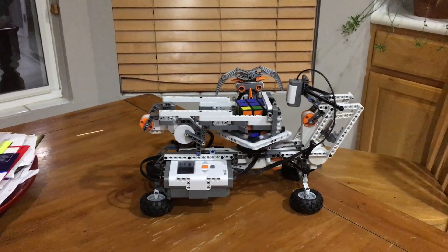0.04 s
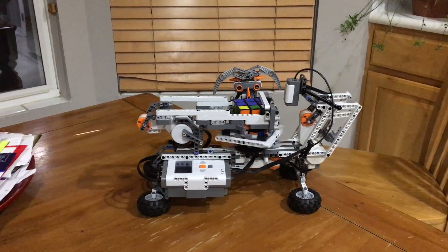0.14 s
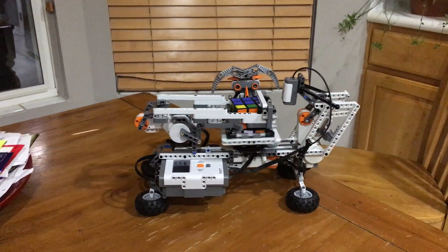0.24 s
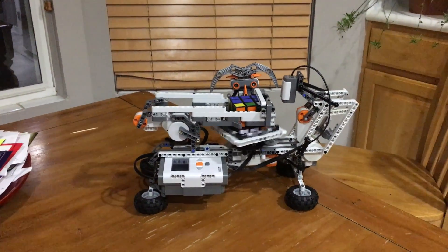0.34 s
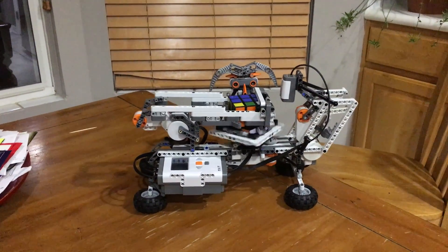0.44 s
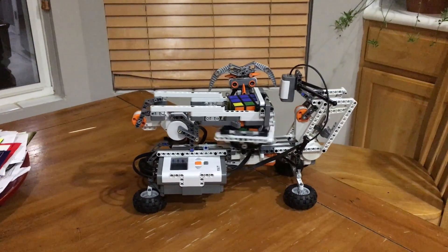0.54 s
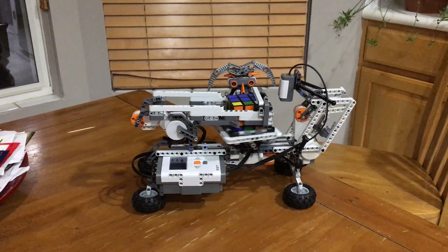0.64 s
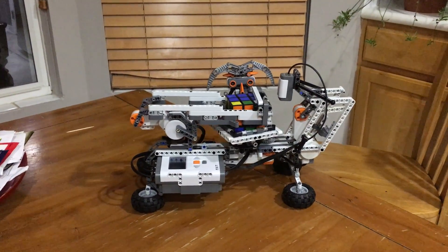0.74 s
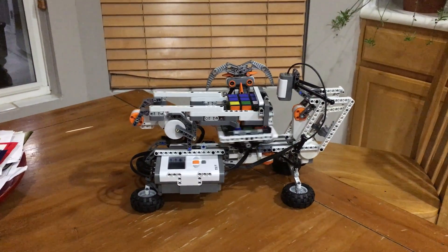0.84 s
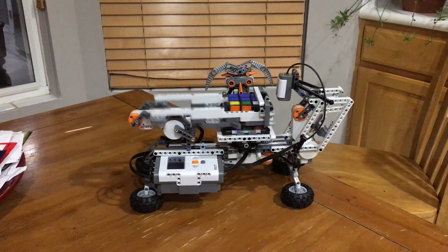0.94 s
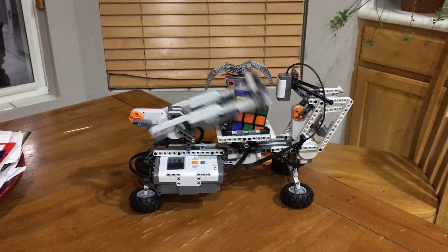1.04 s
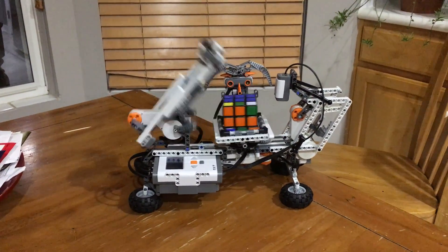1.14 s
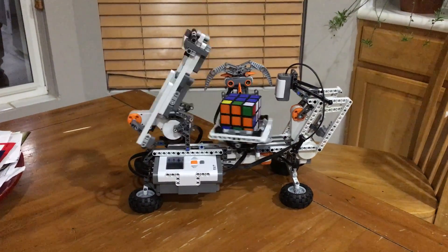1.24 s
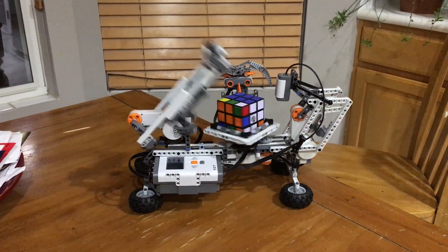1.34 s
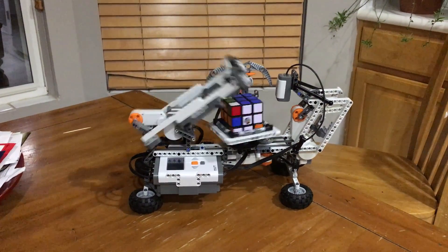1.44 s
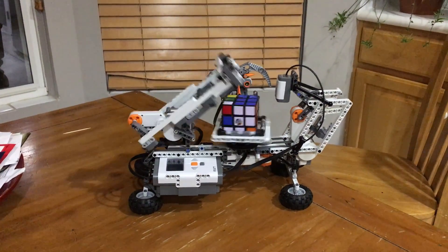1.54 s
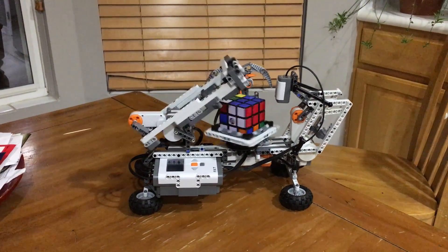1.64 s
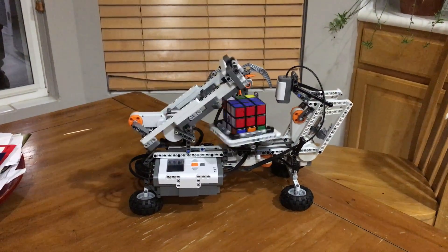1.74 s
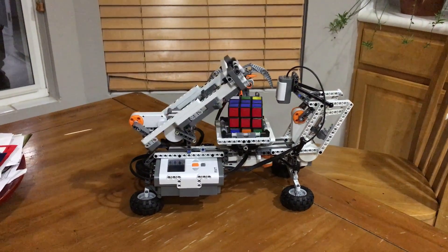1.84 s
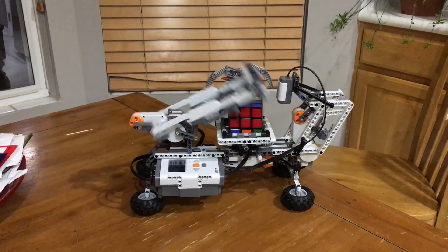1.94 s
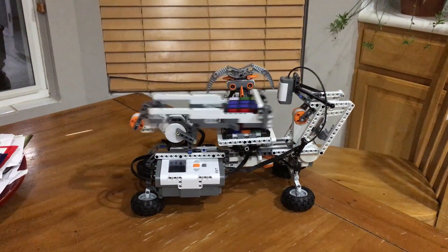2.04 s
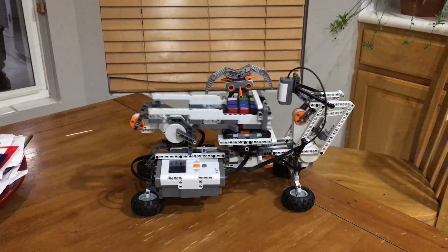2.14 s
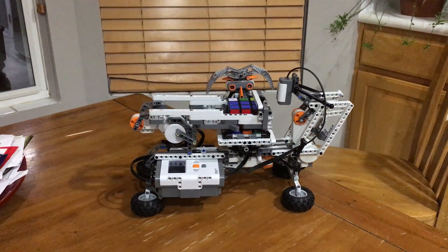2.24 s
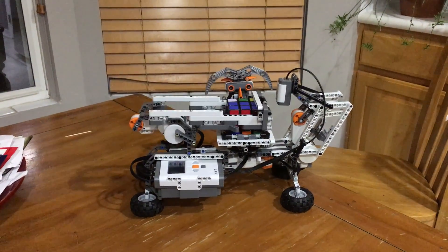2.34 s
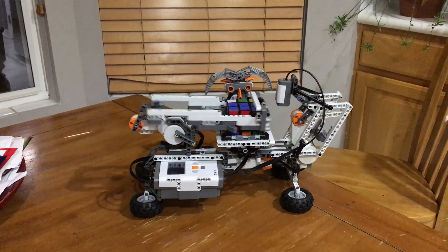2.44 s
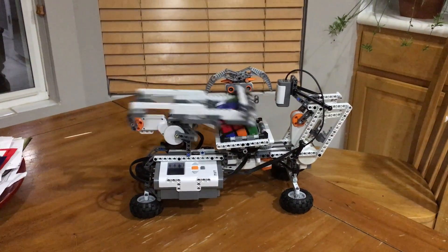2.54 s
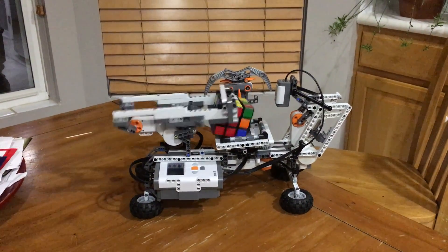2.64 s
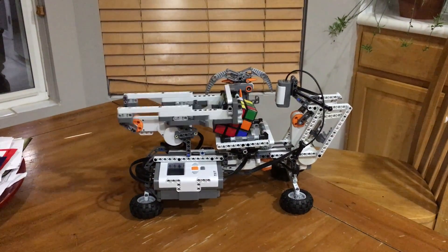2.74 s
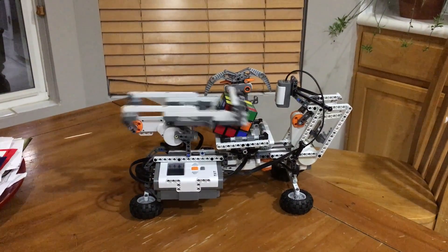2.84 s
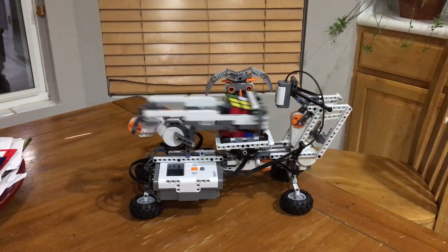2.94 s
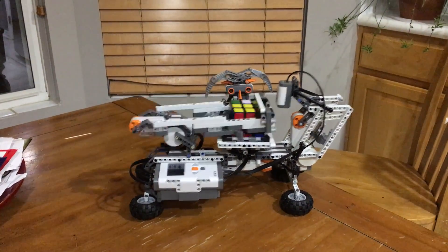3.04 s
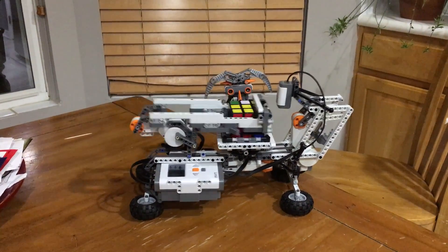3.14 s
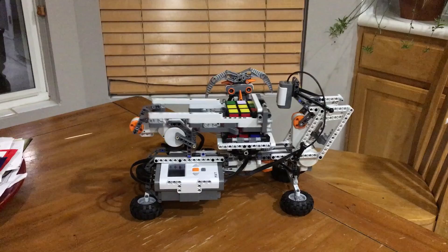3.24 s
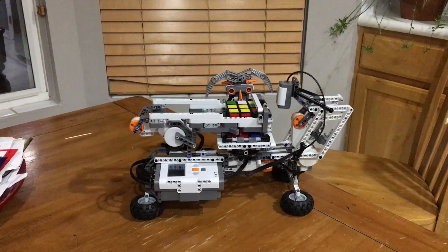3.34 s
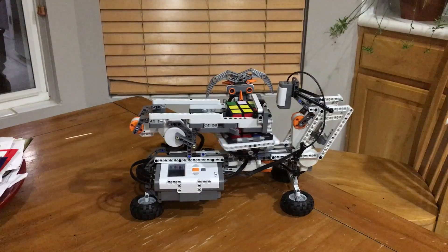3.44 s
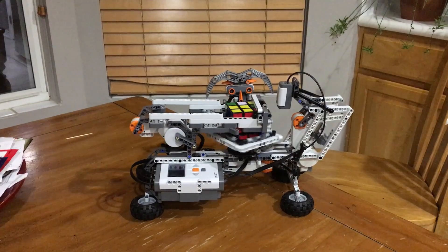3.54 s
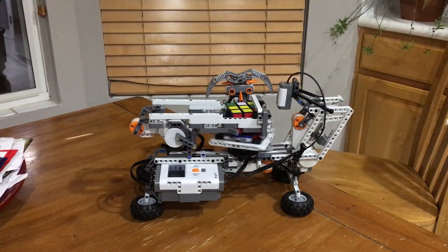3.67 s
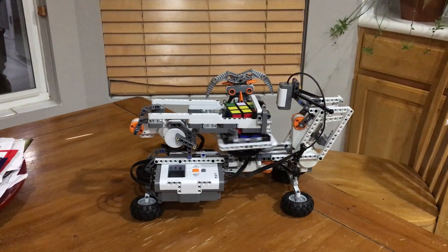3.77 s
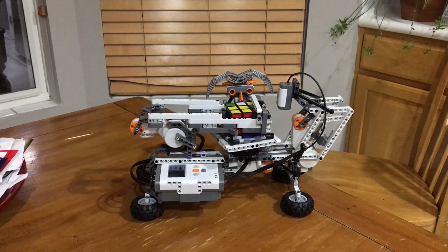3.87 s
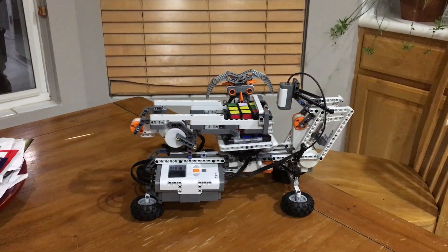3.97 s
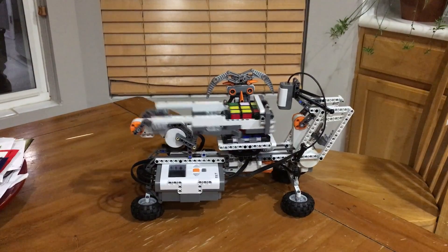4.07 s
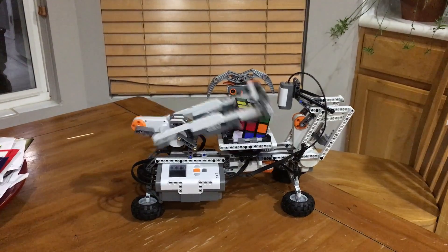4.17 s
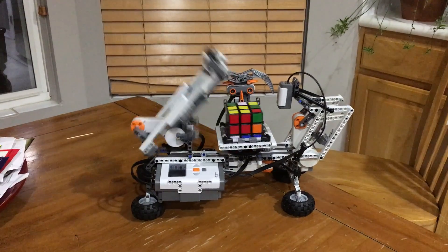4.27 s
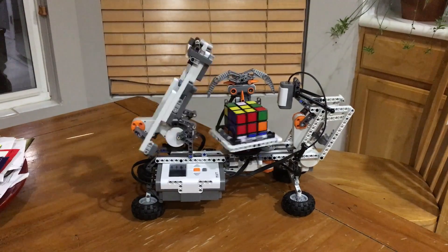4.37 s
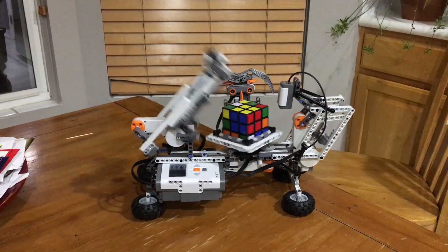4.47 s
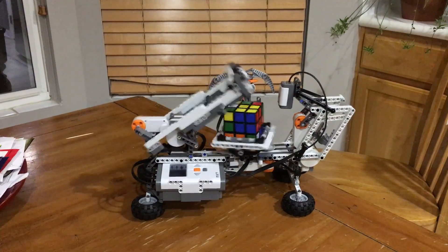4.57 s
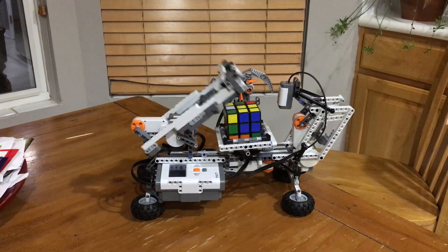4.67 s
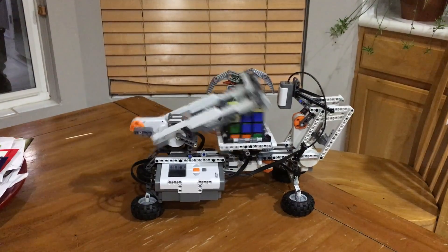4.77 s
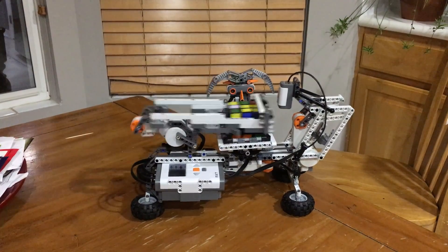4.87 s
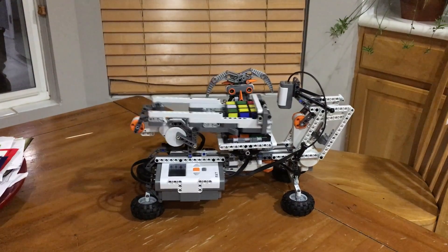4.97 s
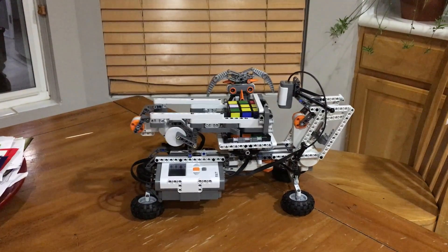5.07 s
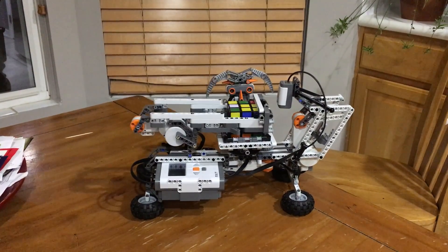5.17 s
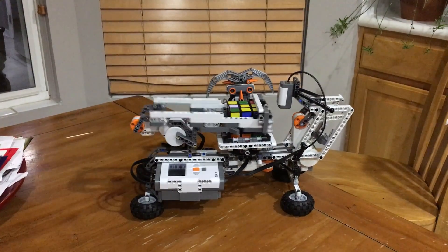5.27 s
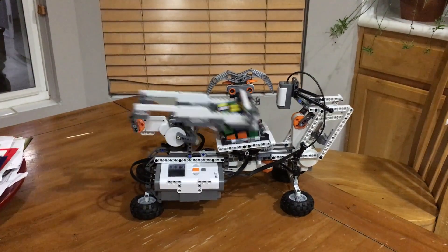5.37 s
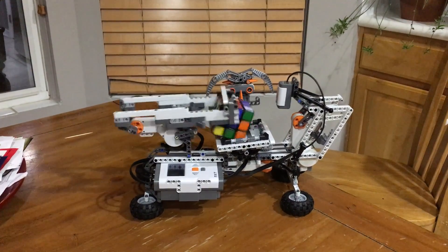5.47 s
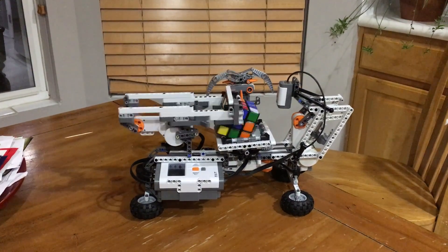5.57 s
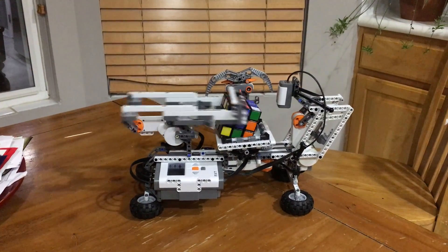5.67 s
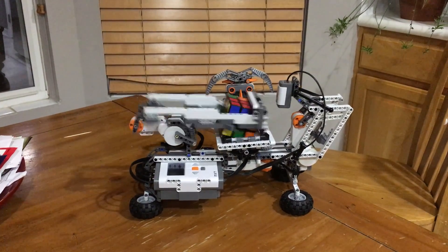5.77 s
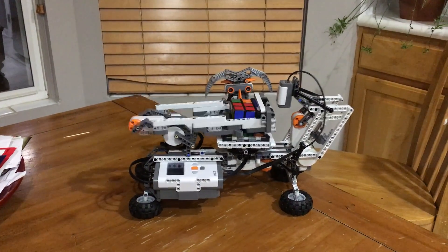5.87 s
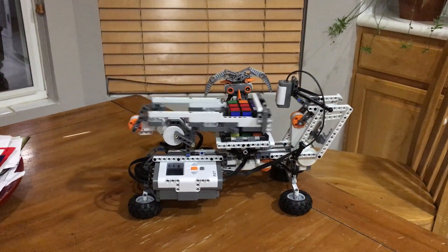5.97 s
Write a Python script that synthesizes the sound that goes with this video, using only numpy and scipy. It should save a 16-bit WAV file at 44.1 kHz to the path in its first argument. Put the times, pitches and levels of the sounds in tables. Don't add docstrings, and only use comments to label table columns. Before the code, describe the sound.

Two small electric motors take turns: a high, buzzy gear whine that bends in pitch, and brief, grittier lifting whirs. Between them come hard plastic clicks, short cube rattles and low knocks through a wooden table. The loudest clatter falls near the end of the second cycle. Room reverberation is short, the air nearly silent, with faint regular pattering near the microphone.

```python
import sys
import numpy as np
from scipy import signal
from scipy.fft import rfft, irfft
from scipy.io import wavfile
from scipy.ndimage import uniform_filter1d

SR = 44100
rng = np.random.default_rng(int(sys.argv[2]) if len(sys.argv) > 2 else 0)


def transcribe(signal):
    frames = np.atleast_2d(signal).T
    limited = np.clip(frames, -1, 1)
    pcm = np.round(limited * 32767).astype(np.int16)
    wavfile.write(sys.argv[1], SR, pcm)


def nominal_scale(level):
    x = np.asarray(level, float) / 20
    return 10 ** x


N = 265072


def evened(x):
    return x / np.sqrt(np.mean(x ** 2) + 1e-20)


def read(points, hz):
    f, value = np.transpose(points)
    return np.interp(np.log(hz + 1), np.log(f + 1), value)


def add(mix, s, sound):
    at = round(s * SR)
    part = mix[max(at, 0):][:len(sound) + min(at, 0)]
    part += sound[max(-at, 0):][:len(part)]


def drift(count, per_s):
    size = max(int(SR / per_s), 1)
    return evened(uniform_filter1d(uniform_filter1d(rng.standard_normal(count), size), size))


def span(length):
    return np.arange(int(np.ceil(length / .2) * .2 * SR)) / SR


# (frequency [Hz], level [dB])
HUSH_COLOUR = [(18, -61), (30, -33), (138, 13.5), (364, 11.5), (684, -16.5), (1590, -11.5), (2350, -48),
               (16000, -58)]


def hush():
    hz = np.fft.rfftfreq(N, 1 / SR)
    noise = rfft(rng.standard_normal(N)) * nominal_scale(read(HUSH_COLOUR, hz))
    return nominal_scale(-82.5) * evened(irfft(noise, N))


def room(x):
    t = np.arange(9000) / SR
    low = uniform_filter1d(rng.standard_normal(len(t)), size=8) * 1.088 * nominal_scale(-60 * t / 0.1835)
    full = rng.standard_normal(len(t)) * nominal_scale(-60 * t / 0.0917)
    tail = (low + full) * (t > .004)
    return signal.oaconvolve(x, tail / np.linalg.norm(tail))[:N]


# (start [s], length [s], level [dB], swell [dB])
SPELLS = [
    (0, 0.048, -50, -0.5),
    (0.079, 0.983, -58.5, 6.5),
    (1.173, 0.434, -60.5, -4.5),
    (2.081, 0.429, -50.5, -5.5),
    (2.997, .17, -59, 8.5),
    (3.375, 0.782, -63.5, 11.5),
    (4.417, 0.173, -61, 1.5),
    (5.0, 0.461, -53, -3.5),
    (5.896, 0.155, -49.5, 3.5),
]


def patter_db(t):
    levels = []
    for s, length, db, swell_db in SPELLS:
        swell = swell_db * np.clip((t - s) / length, 0, 1)
        outside = 600 * np.maximum(s - t, 0) + 119.5 * np.maximum(t - s - length, 0)
        levels.append(db + swell - outside)
    return np.max(levels, axis=0)


# (start [s], end [s])
RUNS = [(.0357, 2.5), (2.553, 5.0), (5.022, 6.0)]
# (time [s], lateness [ms])
LATENESS = [(0, 1.5), (.4, .3), (.75, 1.7), (1.25, -1.3), (2.1, 1.5), (3.25, 1.4), (3.7, 2.7), (4.4, 1.3),
            (5.05, 1.6), (5.45, -1.2)]


def patter():
    t = np.arange(800) / SR - .003
    hz = 265 + 330 / (1 + np.exp((t - .0004) / .0003))
    turns = np.cumsum(hz) / SR - np.sum(hz[t < 0]) / SR
    since = t + .0004
    shape = np.where(since < 0, np.exp(-(since / .0013) ** 2), np.exp(-since / .0034))
    chirp = np.cos(2 * np.pi * turns) * shape
    chirp -= .3 * np.exp(-((t + .0009) / .0002) ** 2)
    thump = np.sin(2 * np.pi * 185 * (t + .003)) * np.hanning(len(t))

    beat_s = .04855
    beats = np.concatenate([np.arange(start, end, beat_s) for start, end in RUNS])
    luck = rng.standard_normal((len(beats), 4))
    at = beats + np.interp(beats, *np.transpose(LATENESS)) / 1000 - .003
    size = nominal_scale(patter_db(beats) + 2.0 + 2 * luck[:, 0])
    train, thumps = np.zeros((2, N + SR))
    for k, (late_s, echo_db) in enumerate([(0, 0), (.0168, -13), (.033, -19)]):
        train[((at + late_s) * SR).astype(int)] += size * nominal_scale(echo_db + k * luck[:, k])
    thumps[(at * SR).astype(int)] = size * .22 * nominal_scale(3.5 * luck[:, 3])

    i = np.arange(3000)
    swell = signal.oaconvolve(train, nominal_scale(-60 * i / SR / 0.18) * (i > 250))[:N]
    band = signal.butter(4, [80, 900], "band", fs=SR, output="sos")
    murmur = signal.sosfilt(band, swell * rng.standard_normal(N))
    ticks = signal.oaconvolve(train, chirp) + signal.oaconvolve(thumps, thump)
    return ticks[:N] + nominal_scale(-5.0) * murmur


# (frequency [Hz], time to fall 60 dB [s])
TABLE_MODES = [(142, .09), (272, .07)]


def thud(s, db, upper_db):
    t = np.arange(9000) / SR
    modes = 0
    for mode_db, (f, t60) in zip((0, upper_db), TABLE_MODES):
        tone = np.sin(2 * np.pi * f * rng.uniform(0.9434, 1.04) * t)
        modes = modes + nominal_scale(mode_db - 60 * t / t60) * tone
    return s, nominal_scale(db + 2.8) * modes * (1 - np.exp(-t / .006)) * (1 + .45 * drift(len(t), 120))


# (time [s], peak level [dB], upper mode against lower [dB])
THUDS = [(1.204, -54, -2), (1.491, -45, 2.5), (2.123, -55, 0), (2.169, -60.5, 5), (2.716, -60, -9.5),
         (3.135, -53, -2), (4.348, -50.5, -5.5), (4.634, -43.5, -6.5), (4.921, -52.5, 8.5),
         (4.968, -57, -7), (5.94, -46, 4.5)]


def table_thuds(mix):
    for row in THUDS:
        add(mix, *thud(*row))


def knock(s, db, hz, fizz_db):
    t = np.arange(2600) / SR
    ring = np.sin(2 * np.pi * hz * t) * nominal_scale(-60 * t / 0.043)
    crack = rng.standard_normal(len(t)) * nominal_scale(-60 * t / 0.028)
    crack = signal.sosfilt(signal.butter(2, 2500, "high", fs=SR, output="sos"), crack)
    return s, nominal_scale(db - 5.5) * (ring + nominal_scale(fizz_db - 4.5) * crack) * np.minimum(t / 0.0005, 1)


# (time [s], peak level [dB], ring [Hz], crack against ring [dB])
KNOCKS = [(1.021, -41, 2130, -16.5), (1.164, -59, 1360, -6.5), (1.463, -45.5, 1115, 17),
          (2.091, -39.5, 1901, 15), (2.724, -40, 1390, -31.5), (2.782, -44.5, 1416, -34),
          (2.987, -33, 1182, -14.5), (3.225, -52, 1201, -0.5), (3.324, -51.5, 1176, -12.5),
          (3.531, -30.5, 1895, -22), (4.595, -35, 1720, 13.5), (4.852, -47.5, 1155, -30),
          (4.877, -30, 1219, 3), (4.916, -29.5, 1287, 1.5), (4.958, -30.5, 1272, -8.5),
          (5.545, -37, 1647, -39), (5.847, -44, 1256, -20.5), (5.889, -44.5, 1242, -4)]


def plastic_knocks(mix):
    for row in KNOCKS:
        add(mix, *knock(*row))


def casing_db(casing, hz, lift_db):
    colour, peaks = casing
    humps = sum(1 / (1 + ((hz - f) / w) ** 2) * nominal_scale(db / 4) for f, w, db in peaks)
    return read(colour, hz) + 20 * np.log10(1 + nominal_scale(lift_db) * humps)


def radiate(drive, casing, level_db, mid_db, fizz_db, lift_db):
    hz = np.fft.rfftfreq(len(drive), 1 / SR)
    z = rfft(drive) * nominal_scale(casing_db(casing, hz, lift_db))
    step = [1 / (1 + (edge / (hz + 1)) ** 16) for edge in (2800, 7000)]
    panels = (1 - step[0], step[0] - step[1], step[1])
    sound = 0
    for panel, db in zip(panels, (0, mid_db, fizz_db)):
        sound = sound + nominal_scale(level_db + db) * evened(irfft(z * panel, len(drive)))
    return sound


def mottle(x, patch_db):
    z = signal.stft(x, nperseg=256)[2]
    patches = uniform_filter1d(rng.standard_normal(z.shape), size=3, axis=0)
    patches = uniform_filter1d(patches, size=7, axis=1)
    return np.resize(signal.istft(z * nominal_scale(patch_db * evened(patches)), nperseg=256)[1], len(x))


def tumble(row, from_db, to_db):
    s, length, db, hz, bright_db = row
    t = span(length + .13)
    force_db = db + np.interp(t, [0, length], [from_db, to_db]) - 244.5 * np.maximum(t - length, 0)
    mid_db = -6 + bright_db - 97 * t
    fizz_db = -5.5 + bright_db - 165 * t
    hollow_hz = hz * (1 + 0.055 * (1 - 2 * np.minimum(t / length, 1)))
    return s, force_db, mid_db, fizz_db, hollow_hz


# (frequency [Hz], width [Hz], level [dB])
CUBE = [(240, -57.5), (400, -31.5), (607, -7), (1310, 4.5), (2320, -7), (4310, -4.5), (4800, -16),
        (5430, -5), (6740, -21), (12100, -31.5), (16000, -28.5)], [(3624, 29, -16.5), (4199, 14, 4.5),
        (5610, 13, -11)]


def clatter(motion):
    s, force_db, mid_db, fizz_db, hollow_hz = motion
    n = len(force_db)
    taps = (rng.random(n) < 3000 / SR) * rng.standard_normal(n)
    taps = taps * nominal_scale(2 * np.minimum(rng.exponential(1, n), 3))
    drive = mottle(evened(taps) + 1.6 * rng.standard_normal(n), 4.06)
    turn = np.exp(2j * np.pi * np.cumsum(hollow_hz) / SR)
    r = np.exp(-np.pi * 230 / SR)
    hollow = signal.lfilter([(1 - r) ** 2], [1, -2 * r, r * r], drive / turn)
    hollow = evened((turn * hollow).real)
    i = np.arange(n)
    edge = np.minimum(np.minimum(i / (0.00067 * SR), i[::-1] / (0.023 * SR)), 1)
    body = radiate(drive, CUBE, force_db - 3, mid_db + 3, fizz_db + 3, 4.)
    return s, (body + nominal_scale(force_db - 9.5) * hollow) * edge


# (start [s], chatter [s], force [dB], cradle hollow [Hz], brightness [dB])
SLIDES = [(1.461, .014, -48, 1256, 3.5), (2.082, 0.0261, -48, 1405, 7.5), (2.715, .026, -58.5, 1254, -12),
          (2.985, 0.0982, -43.5, 1302, 5), (4.85, 0.038, -44, 1226, -5), (5.542, 0.0649, -59.5, 1563, -8),
          (5.846, 0.0719, -43.5, 1253, 1.5)]
DROPS = [
    (1.163, .044, -42, 1238, -0.5),
    (2.78, .052, -52, 1477, -11.5),
    (4.913, 0.092, -37.5, 1271, 5.5),
]
SHAKES = [
    (4.305, .13, -54, 1326, 7.6),
    (4.59, .08, -50, 1740, 8.04),
]


def cube_clatter(mix):
    for rows, from_db, to_db in [(SLIDES, -5.5, 0), (DROPS, 0, -15), (SHAKES, 0, -3)]:
        for row in rows:
            add(mix, *clatter(tumble(row, from_db, to_db)))


def spin_up(top_hz, missing, tau_s):
    return lambda s, t: top_hz * (1 - missing * np.exp(-t / tau_s))


def burst(row, gait, speed):
    s, length, db, swell_db, bright_db = row
    rise, rise_db, fall, fall_db, mid_db, fizz_db, whine_db = gait
    t = span(length)
    hz = speed(s, t)
    edge_db = -rise_db * np.clip(1 - t / rise, 0, 1) - fall_db * np.clip(1 - (length - t) / fall, 0, 1)
    stop_db = -3000 * np.maximum(t - length, 0)
    effort_db = db + swell_db * t / length + edge_db + stop_db
    bright_db = bright_db + 15.5 * np.log2(hz / hz.max())
    return (s, hz, effort_db, mid_db + bright_db + .05 * edge_db,
            fizz_db + bright_db + 0.37 * edge_db, whine_db + .4 * edge_db)


def motor(motion, casing, orders, noise_db, rough):
    s, hz, effort_db, mid_db, fizz_db, whine_db = motion
    n = len(effort_db)
    turns = np.cumsum(hz * (1 + 0.0021 * drift(n, 50))) / SR
    rattle = rng.standard_normal(n) * (1 + 0.1 * np.cos(2 * np.pi * turns / 10)) * nominal_scale(1.5 * drift(n, 150))
    grid = np.arange(0, 8000, 4)
    flare_db = 1.074 * (casing_db(casing, grid, 7.6) - read(casing[0], grid))
    whine = 0
    for k, db in orders:
        broken = min(rough * np.sqrt(k * hz.mean() / 1000), 1)
        flutter = drift(n, k * hz.mean() / 25) + 1j * drift(n, k * hz.mean() / 25)
        line = (1 - broken + broken * flutter) * np.exp(2j * np.pi * (k * turns + rng.random()))
        whine += nominal_scale(db + np.interp(k * hz, grid, flare_db) + 4 * drift(n, 16)) * line.real
    hiss = radiate(mottle(rattle, 4.), casing, effort_db + noise_db, mid_db, fizz_db, 5.)
    ends = signal.windows.tukey(n, min(0.0039 * SR / n, 1))
    return s, (hiss + nominal_scale(effort_db + whine_db) * evened(whine)) * ends


def run(mix, rows, gait, speed, casing, orders, noise_db, rough):
    for row in rows:
        add(mix, *motor(burst(row, gait, speed), casing, orders, noise_db, rough))


# colour (frequency [Hz], level [dB]), resonances (frequency [Hz], width [Hz], level [dB])
LIFTER = [(410, -57), (700, -34.5), (1040, -19.5), (1620, 0.5), (1800, -11.5), (2130, -0.5), (2590, -19.5),
          (4260, -5.5), (4990, -17.5), (10700, -43), (12200, -31), (16000, -44.5)], [(2130, 57, -14.5),
          (3503, 210, -14), (4232.5, 27, -9), (5700, 160, 2.5), (7277, 250, 4.5), (9520, 130, -0.5),
          (15900, 300, 7.5)]
LIFTS = [
    (1.0, .115, -48.5, 2, 0),
    (4.14, .12, -42, -10, 0),
]
REACHES = [
    (1.97, .12, -68, 10.1, -1),
    (2.885, 0.10496, -65.5, 1.5, 4.5),
    (4.81, .05, -61, 7, -4),
    (5.72, 0.1213, -73, 2.3, 6),
]
TOPS = [
    (1.1, .12, -48, -2, -0.19),
    (4.245, 0.1284, -46, -5.5, -1.42),
]
LIFT_GAIT = (0.0508, 29, .015, 3.5, 3, -10.5, -3.5)
REACH_GAIT = (0.0669, 18.5, -0.5, 1, 5, -4.5, -14)
TOP_GAIT = (0.01, 10, 0.0769, 23.5, 3.5, -10, -1.5)
LIFTING = [(2, -3), (3, -2.5), (4, -5), (5, -6.5), (6, -5.5)]
LIFTING_TOP = [(2.29, -3.5), (3.13, -18), (3.42, -5.5), (5.7, -7.5)]


def lifter_raises(mix):
    speed = spin_up(top_hz=712, missing=.01, tau_s=.05)
    run(mix, LIFTS, LIFT_GAIT, speed, LIFTER, LIFTING, -4., .33)
    run(mix, REACHES, REACH_GAIT, speed, LIFTER, LIFTING, -4., .33)
    run(mix, TOPS, TOP_GAIT, speed, LIFTER, LIFTING_TOP, -3., .25)


PUSHES = [
    (2.53, 0.1941, -54.5, -9, 0.032),
    (5.37, .18, -52, -11.5, 2.48),
]
PUSH_GAIT = (0.07, 25, 0.0356, 7.5, 0, -3, -2.5)
PUSHING = [(2, 6), (3, -7), (4, 2), (5, -10.5), (6, -0.5)]


def lifter_pushes(mix):
    run(mix, PUSHES, PUSH_GAIT, spin_up(top_hz=735, missing=.17, tau_s=.055), LIFTER, PUSHING, -4., .4)


TURNER = [(410, -35.5), (700, -28), (1200, -8.5), (1580, 2), (1890, 1.5), (2430, 1), (2800, -14.5),
          (3160, 0), (4490, 3.5), (6230, -6), (7110, -27), (9600, -20), (11100, -34.5), (13100, -12),
          (16000, -30)], [(1620.5, 20, -15.5), (1885.8, 17, 31), (3073, 39, -8.5), (3484, 17, 17),
          (4486, 55, -33), (5356, 78, -6), (6034, 28, 27.5), (9386, 300, -1.5)]
LOADED = [(.95, -1.5), (1.001, 4), (1.152, -4), (1.499, -1), (1.99, -2), (2.149, -7), (2.801, -2),
          (3.202, -2), (3.798, -4.5)]
TURNER_FREE = [(350, -63.5), (600, -22.5), (906, -10), (1370, -3.5), (1780, -7), (4220, -17.5),
               (4580, -13.5), (16000, -41)], [(4413, 6.7, 13), (6356, 49.5, 25.5), (11800, 110, -25.5)]
FREE = [(1, 1), (1.35, -1), (2, 2), (3.2, -2), (5, 5), (6.9, -8.5)]
WINDUP = [
    (1.22, .24, -62, -5, 0.008),
]
NUDGES = [
    (.845, 0.151, -65.5, -3.5, -0.5),
    (3.17, 0.1455, -68, -7, -5),
    (3.995, .135, -62.5, -5, -5),
]
CREEP = [
    (1.52, 0.4566, -71, 0, 0),
]
WINDUP_GAIT = (-1.64, 1, 0.4, -3, 2.5, -1, -1)
NUDGE_GAIT = (0.0038, 9.5, 0.0836, 14, 0, -5, -0.5)
CREEP_GAIT = (0.095, 1.67, 0.11, 14.04, 7.85, 7.16, 2.3)


def turner_adjusts(mix):
    windup_speed = spin_up(top_hz=1800, missing=.4, tau_s=.17)
    nudge_speed = spin_up(top_hz=1275, missing=-.02, tau_s=.08)
    creep_speed = spin_up(top_hz=925, missing=.05, tau_s=.08)
    run(mix, WINDUP, WINDUP_GAIT, windup_speed, TURNER_FREE, LOADED[:2], -3., .6)
    run(mix, NUDGES, NUDGE_GAIT, nudge_speed, TURNER_FREE, LOADED[:2], -3., .6)
    run(mix, CREEP, CREEP_GAIT, creep_speed, TURNER_FREE, FREE, -1.5, .2)


SPINS = [
    (4.43, 0.3618, -50, 0, 0.0017),
]
SPIN_GAIT = (0.3422, 9.5, 0.07, 29, -0.5, 4.5, -1.5)
COASTING = [(0.997, 12.5), (1.128, -13), (2.06, -6), (3.1, -21.5)]


def turner_spins(mix):
    run(mix, SPINS, SPIN_GAIT, spin_up(top_hz=1715, missing=.03, tau_s=.08), TURNER, COASTING, -3., .4)


TWISTS = [
    (-.06, 0.8802, -44.5, -4.5, 0.5),
    (3.445, 0.526, -43.5, -3.5, 0),
]
TWIST_GAIT = (0.0836, 39, 0.0914, 26, 0, 0, -2.5)
# (time [s], rate [Hz])
TWIST_HZ = [(0, 1340), (.1, 1515), (.2, 1575), (.37, 1630), (.52, 1655), (.66, 1600), (.84, 1560),
            (3.45, 1150), (3.54, 1270), (3.6, 1420), (3.67, 1540), (3.74, 1600), (3.93, 1670), (3.99, 1640)]


def turner_twists_cube(mix):
    loaded = lambda s, t: np.interp(s + t, *np.transpose(TWIST_HZ))
    run(mix, TWISTS, TWIST_GAIT, loaded, TURNER, LOADED, -5., .2)


def scene():
    robot = np.zeros(N)
    table_thuds(robot)
    plastic_knocks(robot)
    cube_clatter(robot)
    lifter_raises(robot)
    lifter_pushes(robot)
    turner_adjusts(robot)
    turner_spins(robot)
    turner_twists_cube(robot)
    return (robot + nominal_scale(-7.5) * room(robot) + patter() + hush())[None]


def low_pass(x):
    return signal.sosfilt(signal.butter(12, 16470, fs=SR, output="sos"), x)


def record(dry):
    x = signal.sosfilt(signal.butter(1, 48, "high", fs=SR, output="sos"), dry)
    top_edge = signal.firwin(511, 15900, window=("kaiser", 9), fs=SR)
    x = signal.oaconvolve(x, top_edge[None], "same")
    return low_pass(x)


dry = scene()
out = record(dry)
transcribe(out)
```